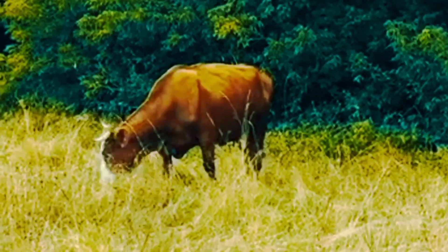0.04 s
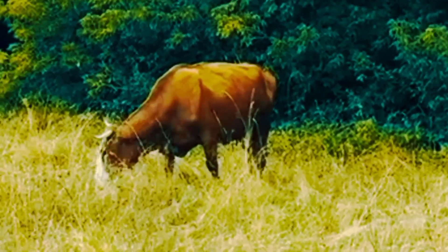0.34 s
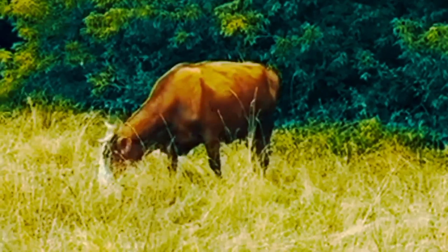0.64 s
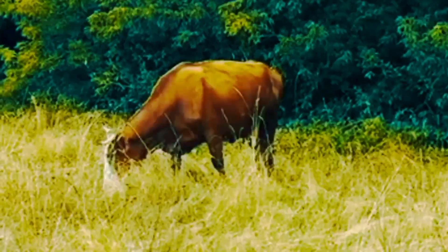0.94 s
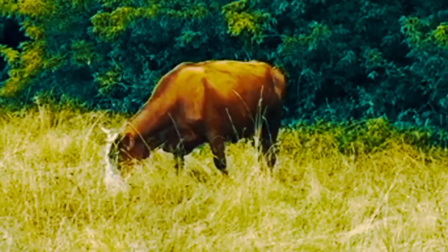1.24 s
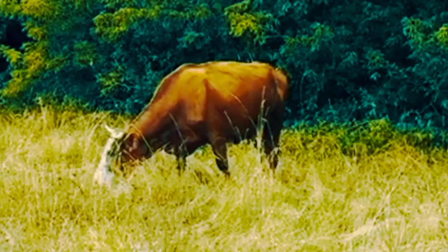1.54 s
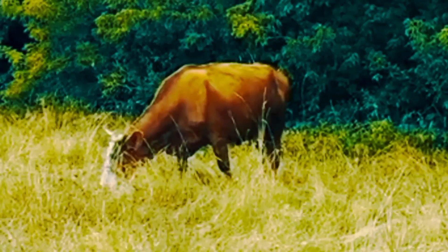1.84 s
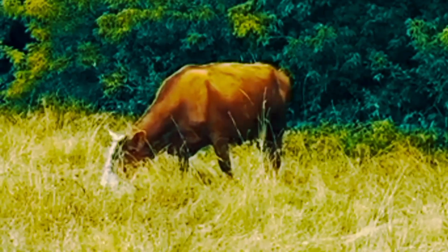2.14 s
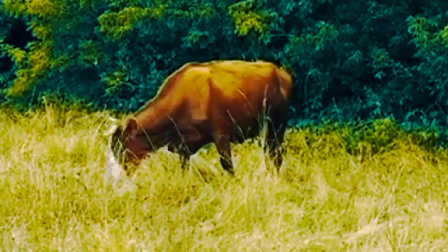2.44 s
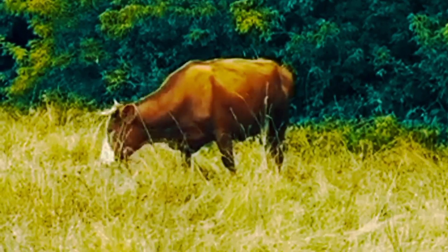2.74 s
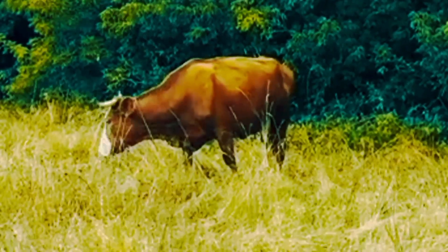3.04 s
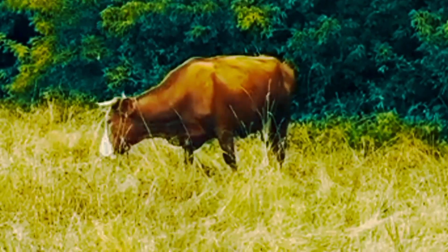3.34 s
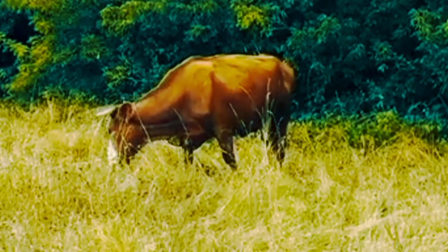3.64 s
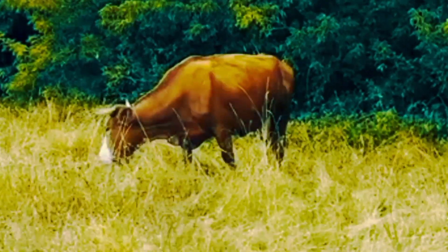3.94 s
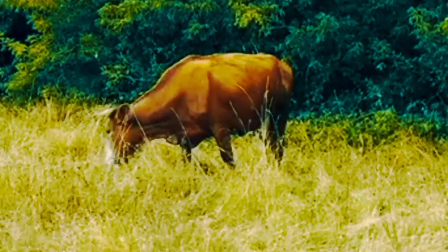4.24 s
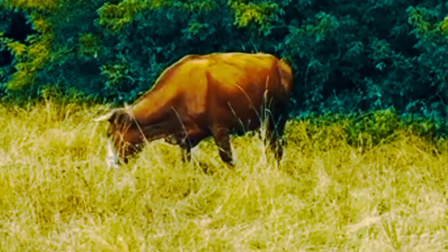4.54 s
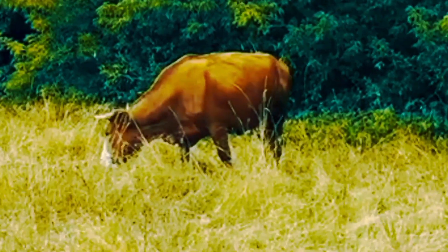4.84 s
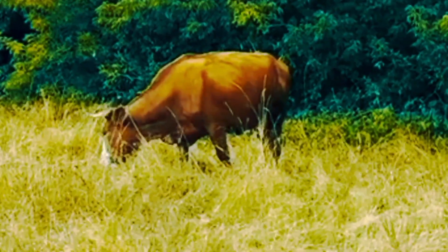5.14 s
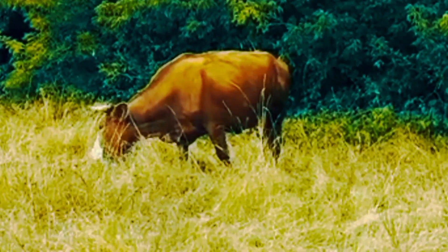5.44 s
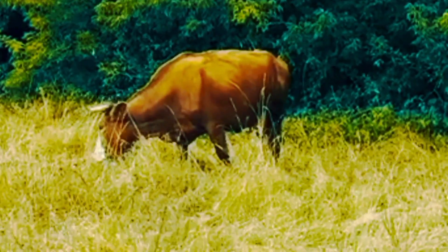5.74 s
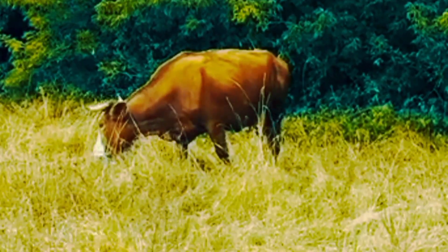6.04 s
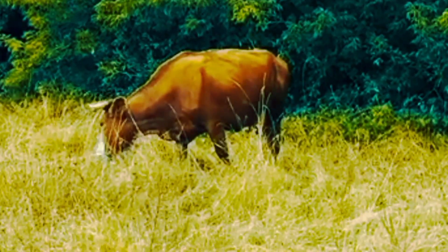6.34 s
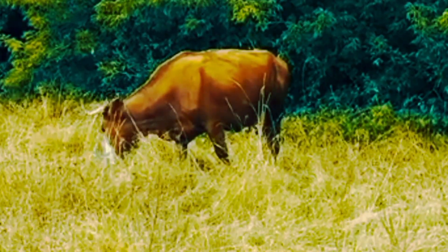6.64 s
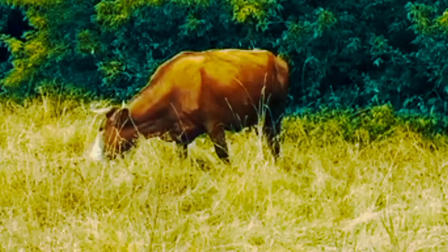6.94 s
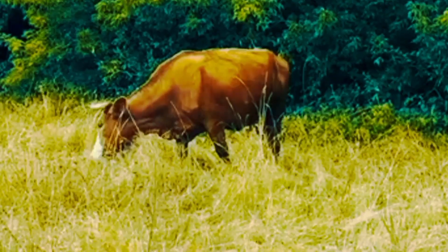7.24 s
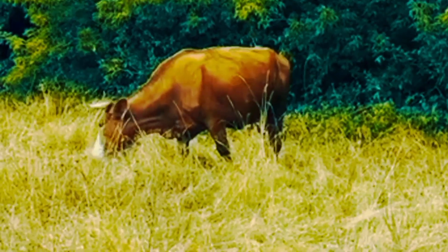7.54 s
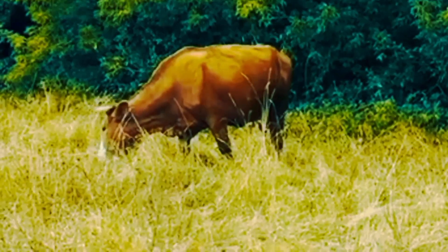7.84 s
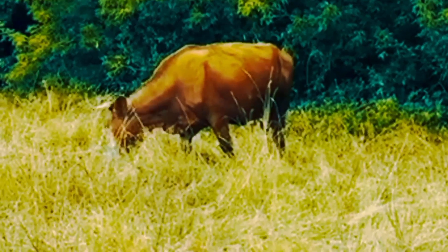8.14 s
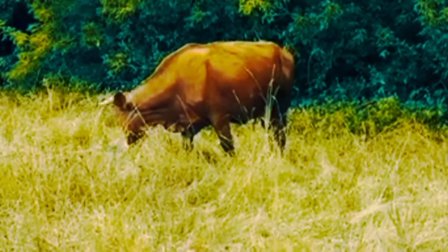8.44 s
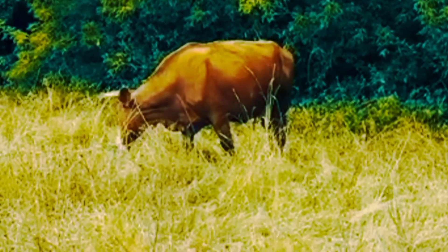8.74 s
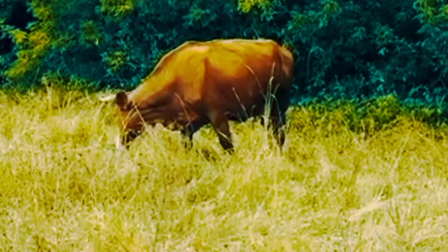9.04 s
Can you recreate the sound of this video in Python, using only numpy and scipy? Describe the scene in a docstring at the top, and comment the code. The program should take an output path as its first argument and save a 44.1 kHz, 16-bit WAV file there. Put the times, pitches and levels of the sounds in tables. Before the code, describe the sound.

Songbirds twitter and whistle over a soft hiss of air, then a cow gives two long moos, one running into the other.

```python
"""Songbirds sing throughout in gliding pure tones, over a distant chorus and a soft hiss of air.
A falling run of slurs opens deep in the trees; evenly repeated twitters and buzzing slides follow,
then, from 4.7 s, a run of thin rising whistles. At 6.7 s a cow moos in a train of vocal-fold pulses;
hard surroundings ring and answer her, and a low rumble comes with her.
At 8.2 s her second call rises out of the end of the first."""
import sys
import numpy as np
from scipy import signal
from scipy.fft import rfft, irfft, next_fast_len
from scipy.io import wavfile
from scipy.ndimage import uniform_filter1d, map_coordinates

SR = 44100
rng = np.random.default_rng(int(sys.argv[2]) if len(sys.argv) > 2 else 0)


def transcribe(signal):
    """Save signal, clipped to [-1, 1], as a 16-bit WAV file at the path in sys.argv[1]."""
    frames = np.atleast_2d(signal).T
    limited = np.clip(frames, -1, 1)
    pcm = np.round(limited * 32767).astype(np.int16)
    wavfile.write(sys.argv[1], SR, pcm)


N = 404838
TIME = np.arange(N) / SR

# tone of the hiss: (frequency [Hz], gain [dB])
AIR_COLOUR = [(20, -1.5), (50, 0), (160, -2.5), (300, -10), (520, -5.5), (800, -9), (1050, -6),
              (1660, -12.5), (4000, -9), (8000, -20.3), (15500, -18.5)]
# its stereo width: (frequency [Hz], side over mid [dB])
AIR_WIDTH = [(30, 4), (120, -6.5), (600, -5.5), (8000, -.5)]
# reverb of the trees and of the hard yard: (frequency [Hz], time to fall 60 dB [s])
TREE_DECAY = [(2000, 0.36), (4500, 0.84), (7000, 0.81)]
YARD_DECAY = [(100, 1), (400, 0.35), (1500, 0.42), (5000, 0.12)]
# fader ride on the far birds: (time [s], relative level [dB])
CHORUS_RIDE = [(0, -37), (.7, -36), (1.63, -32), (2.6, -37.5), (3.3, -31.5), (4.6, -31), (5.5, -36.5),
               (6.6, -39), (7.2, -30), (9.18, -34)]
# their tone: (frequency [Hz], gain [dB])
CHORUS_COLOUR = [(1500, -12), (2100, -8.5), (2700, 2), (3800, 3), (5000, -7), (6500, -19.5), (7600, -49),
                 (8500, -60)]
# course of the falling run: (time [s], start pitch [Hz], level [dB], dry gain [dB])
CASCADE_COURSE = [(.083, 7700, -44, -12), (.86, 7050, -36, -2), (1.16, 5900, -35.5, -1.5),
                  (1.465, 5080, -35.5, -1.5)]
# cues of the rising whistles: (time [s])
WHISTLE_CUES = [4.69, 4.896, 5.119, 5.35, 5.583, 5.818, 6.072, 6.315, 6.576, 6.855, 7.17]
# shapes of a slur, by name: (middle pitch [x start pitch], end pitch [x start pitch])
SLUR_SHAPES = {"fall": (.84, .71), "hook": (.65, .66), "sag": (.94, .93), "scoop": (.94, 1.11),
               "rise": (1.14, 1.17), "climb": (1.4, 1.55), "crest": (1.045, .85)}
# single slurs: (time [s], shape, length [s], start pitch [Hz], level [dB])
SLUR_CUES = [(.34, "sag", .08, 4100, -41), (.424, "crest", .11, 6220, -36), (.49, "sag", .085, 3350, -37),
             (.554, "fall", .1, 5750, -35.5), (.62, "fall", .1, 6900, -36), (.721, "sag", .18, 2680, -37),
             (.745, "scoop", .135, 4030, -29.5), (.965, "scoop", .135, 4000, -31.5),
             (1.0, "sag", .1, 3100, -39), (1.14, "sag", .11, 3680, -37), (1.09, "rise", .06, 2050, -42),
             (1.374, "sag", .11, 3220, -33), (1.585, "fall", .11, 6250, -34.5),
             (1.73, "sag", .09, 3000, -38), (1.777, "fall", .085, 6000, -37),
             (1.93, "climb", .18, 3080, -35.5), (2.426, "hook", .03, 6400, -30),
             (3.08, "hook", .056, 6800, -26.5), (3.18, "fall", .025, 5200, -29),
             (3.729, "sag", .16, 2200, -39), (3.774, "hook", .035, 6700, -28),
             (3.825, "sag", .052, 4450, -26), (4.495, "scoop", .056, 4250, -24),
             (4.503, "sag", .1, 2420, -38), (4.803, "rise", .062, 3090, -30.5),
             (4.954, "sag", .09, 4290, -29.5), (5.068, "sag", .19, 2060, -43),
             (5.201, "sag", .045, 3480, -26.5), (5.279, "sag", .1, 2800, -32),
             (5.338, "fall", .035, 4500, -33), (5.459, "fall", .042, 4100, -35),
             (6.915, "fall", .08, 4700, -38), (8.831, "rise", .072, 3120, -35),
             (8.995, "sag", .12, 4170, -33.5)]
# notes of each syllable, by name: (delay [s], length [s], start pitch [Hz], middle pitch [Hz],
# end pitch [Hz], relative level [dB], buzz swing [Hz])
SYLLABLES = { "long slide": [(0, .07, 6540, 6600, 6240, -6.5, 444), (.065, .08, 6420, 5050, 3920, 0.5, 93),
             (.148, .055, 3750, 3000, 2550, -4, 60)], "short slide": [(0, 0.013, 4680, 5978, 6700, -2.5, 0),
             (.01, 0.077, 6560, 6200, 5350, 0, 453), (.08, .035, 5250, 4425, 3950, 0.5, 94),
             (.112, .03, 4200, 3350, 2950, -1, 92), (.143, 0.0355, 2510, 2833, 2350, -2.5, 101)],
             "twitter": [(0, 0.034, 4680, 5050, 5280, -3.5, 0), (.013, .023, 3940, 4750, 5230, 0.5, 0),
             (.03, .018, 3600, 4200, 4400, 2.5, 0), (.043, .02, 4856, 3642, 3230, 0.5, 302)],
             "swoop": [(0, 0.05, 6850, 5850, 5500, -5, 90), (.036, .03, 5460, 4400, 3850, 5.5, 0),
             (.06, .045, 3950, 3800, 3700, 1.5, 0)], "arch": [(0, 0.05, 2490, 3090, 3780, -2.5, 0),
             (.043, 0.03, 3685, 3804, 3250, 5.5, 0)], "chip": [(0, 0.031, 2668, 3160, 3520, 1, 0),
             (.02, 0.0101, 3560, 3180, 2620, 4.5, 0)], "buzz": [(0, .11, 5250, 5180, 5150, 0, 330)]}
# evenly repeated syllables:
# (syllable, first time [s], last time [s], count, first level [dB], last level [dB])
PHRASES = [("arch", 2.06, 2.592, 5, -33, -37), ("swoop", 2.725, 4.106, 3, -30.5, -29.5),
           ("chip", 2.837, 3.544, 6, -35.5, -30.5), ("twitter", 2.909, 3.48, 5, -27.5, -29.5),
           ("long slide", 3.631, 4.407, 4, -27.5, -23), ("buzz", 4.632, 5.15, 5, -37, -36.5),
           ("twitter", 7.473, 8.002, 5, -27.5, -27), ("short slide", 8.143, 9.063, 5, -26.5, -26.5)]
# sharp downward ticks: (time [s], start pitch [Hz], level [dB])
TICK_CUES = [(5.272, 5400, -31), (5.507, 4200, -32), (5.7, 5400, -35), (5.746, 4700, -28),
             (5.937, 5600, -28), (5.988, 4400, -29.5), (6.233, 4900, -29.5), (6.485, 4400, -34),
             (6.751, 5200, -33), (7.408, 5200, -35)]
# trills: (time [s], length [s], pitch [Hz], swing [Hz], trill rate [Hz], level [dB])
TRILL_CUES = [(2.777, 0.21, 7500, 130, 42, -42.5), (5.316, 0.28, 7480, 120, 42, -46),
              (5.396, 0.47, 4710, 60, 42, -42), (6.1, 0.17, 4700, 60, 35, -44),
              (8.22, 0.32, 7500, 110, 75, -48.5)]
# where the singers sit in the mix: (time [s], wet over dry [dB], left over right [dB])
SONG_PLACEMENT = [(0, -4.5, -2.4), (1.8, -1.5, -4.2), (2.3, -3, -3.2), (4.5, -5, -1.4), (6, -4, -.6),
                  (9.18, -12.5, 0)]
# fader ride on the rumble: (time [s], level [dB])
RUMBLE_RIDE = [(6.55, -70), (6.75, -43), (6.96, -36), (7.0, -32), (7.07, -38.5), (7.8, -39), (8.3, -36.5),
               (9.18, -40)]
# its tone: (frequency [Hz], gain [dB])
RUMBLE_COLOUR = [(20, -20), (50, 0), (80, -3), (160, -9.5), (400, -16), (900, -16.5), (2000, -25),
                 (5000, -60)]
# performance of each moo: (time [s], pitch [Hz], effort as relative overtone level [dB])
FIRST_MOO = [(6.68, 98.3, -55), (6.742, 102.2, -43), (6.832, 104.9, -36), (6.966, 112.7, -33),
             (7.25, 121.8, -26), (7.276, 122.5, -29), (7.534, 127.7, -23), (7.758, 126.9, -24),
             (7.868, 123.5, -29), (8.042, 112.4, -29), (8.156, 99.4, -35), (8.2, 91.4, -41)]
SECOND_MOO = [(8.2, 90.8, -41), (8.308, 93.5, -42), (8.458, 100.1, -42), (8.508, 104.4, -43),
              (8.576, 106.9, -43), (8.728, 116.5, -33), (8.806, 119.0, -26), (8.922, 125.7, -30),
              (8.956, 130.6, -27), (8.986, 132.9, -26), (9.158, 139.8, -28), (9.18, 142.0, -29)]
# body of each moo, before trim: (time [s], fundamental level [dB], octave level [dB])
FIRST_CHEST = [(6.68, -49, -59), (6.764, -36, -45), (6.862, -31, -45), (7.006, -33, -33), (7.03, -36, -46),
               (7.188, -40, -23), (7.754, -35, -26), (7.802, -34, -36), (7.906, -45, -20),
               (8.122, -37, -39), (8.2, -43, -37)]
SECOND_CHEST = [(8.25, -43, -38), (8.558, -42, -37), (8.596, -39, -29), (8.69, -32, -38), (8.796, -49, -25),
                (8.83, -33, -31), (8.93, -43, -19), (8.954, -32, -28), (9.18, -35, -19)]
# resonances of each moo, voice and ringing surroundings together: (frequency [Hz], gain [dB])
FIRST_MOO_COLOUR = [(250, -19), (295, 8.5), (380, 0), (500, -7.5), (635, -2), (760, -14), (890, 4.5),
                    (1020, -0.5), (1140, -12.5), (1270, 0.5), (1520, -10), (1660, 0.5), (1900, -20),
                    (2170, -5), (2400, -5), (2700, -22.5), (3300, -17.5), (4800, -35), (6500, -54)]
SECOND_MOO_COLOUR = [(230, -14), (320, 5), (480, -7.5), (700, -5), (834, -0.5), (940, -6), (1070, 6.5),
                     (1220, -14), (1385, 2.5), (1650, -21), (2230, -2), (3200, -39), (6000, -46)]
# grit in the cow's voice: (time [s], roughness [0-1])
ROUGHNESS = [(6.7, 0.21), (7.0, 0.07), (7.2, 0.02), (7.8, .03), (7.95, .2), (8.1, .45), (8.6, .25),
             (8.75, .48), (8.98, .38), (9.15, .15)]


def amp(db):
    """Decibels to gain."""
    return 10 ** (np.asarray(db) / 20)


def unit(x):
    """Scale to rms 1."""
    return x / np.sqrt(np.mean(x ** 2) + 1e-20)


def along(points, hz):
    """Read (frequency [Hz], value) points on a log axis."""
    f, v = np.transpose(points)
    return np.interp(np.log(hz + 1), np.log(f + 1), v)


def curves(rows):
    """One automation curve for each column after the time."""
    s, *cols = np.transpose(rows)
    return [np.interp(TIME, s, c) for c in cols]


def wobble(rate, size=N):
    """A smooth random curve, rate knots a second."""
    knots = rng.standard_normal(int(size * rate / SR) + 4)
    return map_coordinates(knots, [np.arange(size) * rate / SR])


def filtered(x, response):
    """Zero-phase EQ; response gives the gain at each frequency."""
    m = next_fast_len(N + SR // 8, real=True)
    return irfft(rfft(x, m) * response(np.fft.rfftfreq(m, 1 / SR)), m)[..., :N]


def resonate(x, spectrum, size=4096):
    """Minimum-phase EQ: every pulse rings after it arrives."""
    cepstrum = irfft(np.log(amp(along(spectrum, np.fft.rfftfreq(size, 1 / SR)))))
    cepstrum[1:size // 2] *= 2
    cepstrum[size // 2 + 1:] = 0
    return signal.oaconvolve(x, irfft(np.exp(rfft(cepstrum))))[:N]


def noise(spectrum, width):
    """Coloured stereo noise of rms 1."""
    white = rng.standard_normal((2, N))
    mid, side = filtered(white, lambda hz: amp([along(spectrum, hz),
                                                along(spectrum, hz) + along(width, hz)]))
    return unit(np.array([mid + side, mid - side]))


def reverb(x, decay):
    """A diffuse stereo tail; each frequency dies at its own speed."""
    hz, t, bands = signal.stft(rng.standard_normal((2, SR)), SR, nperseg=256)
    tail = signal.istft(bands * amp(-60 * t / along(decay, hz)[:, None]), SR, nperseg=256)[1]
    tail = np.pad(tail / np.linalg.norm(tail[0]), ((0, 0), (SR // 100, 0)))  # 10 ms pre-delay
    return signal.oaconvolve(x[None], tail, axes=1)[:, :N]


def add(track, s, sound):
    """Mix a sound in at time s."""
    part = track[max(round(s * SR), 0):][:len(sound)]
    part += sound[:len(part)]


def band_level(x, lo_hz, hi_hz):
    """Running rms of one band."""
    band = signal.sosfilt(signal.butter(8, [lo_hz, hi_hz], "bandpass", fs=SR, output="sos"), x)
    return np.sqrt(np.abs(uniform_filter1d(band ** 2, SR // 12)) + 1e-12)


def air():
    """The bed: a soft, steady hiss of still air."""
    return amp(-42) * noise(AIR_COLOUR, AIR_WIDTH)


def note(length, start_hz, middle_hz, end_hz, swing_hz=0, trill_hz=150,
         waver=.0062, flutter_db=2, overtone_db=-42):
    """One bird note: a near-pure tone gliding through three pitches, swung to and fro when it buzzes."""
    t = np.arange(max(int(length * SR), 64)) / SR
    progress = t / t[-1]
    contour = np.polyfit([0, .5, 1], np.log([start_hz, middle_hz, end_hz]), 2)
    glide = np.exp(np.polyval(contour, progress))
    swing = swing_hz * np.sin(2 * np.pi * trill_hz * t + .5 * wobble(40, len(t)))
    phase = 2 * np.pi * np.cumsum(glide * (1 + waver * wobble(250, len(t))) + swing) / SR
    swell = np.abs(np.sin(np.pi * progress)) ** .43
    # a buzz is loudest at the bottom of each swing
    flutter = amp(flutter_db * wobble(120, len(t)) - 4.5 * swing / 500)
    return unit(swell * flutter * (np.sin(phase) + amp(overtone_db) * np.sin(2 * phase)))


def chorus(count=560):
    """Many far birds: short random slurs, blurred by the trees, over a wash of noise in their range."""
    song = np.zeros(N)
    for when, span, height, slope, bend, size in rng.random((count, 6)):
        hz = 2000 * 3 ** height
        fall = 1 + .35 * (slope - .4)
        slur = note(.015 + .045 * span, hz * fall, hz * (.92 + .16 * bend), hz / fall, waver=.014)
        add(song, when * N / SR, amp(8.9 * size) * slur)
    song = filtered(song, lambda hz: amp(along(CHORUS_COLOUR, hz)))
    far = unit(song * amp([[-1], [1]]) + reverb(song, TREE_DECAY))
    wash = noise(CHORUS_COLOUR, width=[(3000, -15.5)])
    return amp(curves(CHORUS_RIDE)[0]) * (amp(-4.2) * far + amp(-7.5) * wash)


def cascade(count=19):
    """A bird deep in the trees sings a falling run, growing louder and drier; reverb trails each slur."""
    song = np.zeros(N)
    times, pitch_hz, level_db, _ = np.transpose(CASCADE_COURSE)
    for s in np.linspace(times[0], times[-1], count):
        hz = np.interp(s, times, pitch_hz)
        slur = note(.038, hz, hz * .9, hz * .79, waver=.013)
        add(song, s, amp(np.interp(s, times, level_db)) * slur)
    direct = amp(curves(CASCADE_COURSE)[2]) * song
    return (direct + amp(.5) * reverb(song, TREE_DECAY)) * amp([[-1.6], [1.6]])


def whistler():
    """One bird draws out its rising whistles ever longer, lower and louder; each swells, then fades."""
    song = np.zeros(N)
    for s, progress in zip(WHISTLE_CUES, np.linspace(0, 1, len(WHISTLE_CUES))):
        length = np.interp(progress ** 3, [0, 1], [.14, .23])
        hz = np.interp(progress ** 1.6, [0, 1], [6290, 5840])
        db = np.interp(progress ** 3.2, [0, 1], [-39.8, -30.8])
        tone = note(length, hz, hz * 1.071, hz * 1.328, waver=.0025, flutter_db=2.5, overtone_db=-33)
        swell = amp(np.interp(np.linspace(0, 1, len(tone)), [0, .4, 1], [-8, 0, -11]))
        add(song, s, amp(db) * unit(tone * swell))
    return song + amp(-9.5) * reverb(song, TREE_DECAY)


def songbirds(tick_s=.0095, tick_fall=.86):
    """The featured singers: slurs, repeated phrases, ticks and trills, answered by the trees."""
    song = np.zeros(N)
    for s, shape, length, hz, db in SLUR_CUES:
        middle, end = SLUR_SHAPES[shape]
        add(song, s, amp(db) * note(length, hz, hz * middle, hz * end))
    for name, first_s, last_s, count, first_db, last_db in PHRASES:
        for s, db in np.linspace((first_s, first_db), (last_s, last_db), count):
            for delay, length, *pitches, note_db, swing_hz in SYLLABLES[name]:
                tone = note(length, *pitches, swing_hz, waver=.015, overtone_db=-34)
                add(song, s + delay, amp(db + note_db) * tone)
    for s, hz, db in TICK_CUES:
        add(song, s, amp(db) * note(tick_s, hz, hz * tick_fall, hz * tick_fall ** 2))
    for s, length, hz, swing_hz, trill_hz, db in TRILL_CUES:
        trill = note(length, hz, hz, hz, swing_hz, trill_hz, waver=.0113, flutter_db=2.5)
        add(song, s, amp(db) * trill)
    wet_db, pan_db = curves(SONG_PLACEMENT)
    wet = amp(wet_db)
    blend = (song + wet * reverb(song, TREE_DECAY)) / np.hypot(1, wet)
    return blend * amp([pan_db / 2, -pan_db / 2])


def rumble():
    """Low noise that swells in with the cow and stays under both calls."""
    return amp(curves(RUMBLE_RIDE)[0]) * noise(RUMBLE_COLOUR, width=[(30, 2), (80, -22.5), (800, -1.5)])


def vocal_folds(pitch_hz, jitter, rasp, split):
    """Phase and pulse train of the folds; roughness makes the pulses uneven and breathy."""
    rough = curves(ROUGHNESS)[0]
    phase = 2 * np.pi * np.cumsum(pitch_hz * (1 + jitter * rough * wobble(70))) / SR
    shimmer = amp(5 * rough * wobble(110))
    alternation = 1 + split * rough * np.cos(phase / 2)  # strong and weak pulses take turns
    pulses = unit(np.diff(np.floor(phase / (2 * np.pi)), prepend=0)) * shimmer * alternation
    turbulence = unit(rng.standard_normal(N) * (1 + np.cos(phase)) ** 2)  # air escapes once a cycle
    return phase, pulses + rasp * rough * turbulence


def mouth(voice, effort_db, bright_db, open_db=-31, muffle_hz=760):
    """Effort opens the mouth; below open_db it closes, muffling the vowel and dulling the top end."""
    vowel = filtered(voice, lambda hz: 1 / (1 + (hz / 1480) ** 12))
    top = voice - vowel
    shut_db = np.minimum(effort_db - open_db, 0)
    muffled = filtered(vowel, lambda hz: 1 / (1 + (hz / muffle_hz) ** 10))
    vowel = muffled + amp(.75 * shut_db) * (vowel - muffled)
    brightness = amp(bright_db + 1.7 * shut_db)
    # both bands are levelled, so effort rides the loudness
    levelled = vowel / band_level(vowel, 320, 1450) + brightness * top / band_level(top, 1500, 2600)
    return amp(effort_db) * levelled


def moo(performance, chest_levels, colour, jitter, rasp, split, mouth_db, bright_db):
    """One call as two stems: two strong chest partials; overtones coloured by voice and surroundings."""
    pitch_hz, effort_db = curves(performance)
    phase, pulses = vocal_folds(pitch_hz, jitter, rasp, split)
    overtones = amp(mouth_db) * mouth(resonate(pulses, colour), effort_db, bright_db)
    fundamental_db, octave_db = curves(chest_levels)
    fundamental = amp(fundamental_db + .3) * np.sin(phase)
    octave = amp(octave_db + 1.3) * np.sin(2 * phase)
    chest = np.sqrt(2) * (fundamental + octave)
    fade_in = np.clip((TIME - performance[0][0]) / .057 + .5, 0, 1)
    fade_out = np.clip((performance[-1][0] - TIME) / .035 + 1, 0, 1)
    return np.array([chest, overtones]) * fade_in * fade_out


def cow():
    """Two moos, the second rougher and darker; the yard returns more overtones than chest tone."""
    first = moo(FIRST_MOO, FIRST_CHEST, FIRST_MOO_COLOUR,
                jitter=.022, rasp=.9, split=.1, mouth_db=-2, bright_db=.3)
    second = moo(SECOND_MOO, SECOND_CHEST, SECOND_MOO_COLOUR,
                 jitter=.035, rasp=1, split=.45, mouth_db=-1.7, bright_db=-14)
    chest, overtones = first + second
    direct = (chest + overtones) * amp([[-.7], [.7]])  # just right of centre
    return direct + reverb(amp(-17) * chest + amp(-6) * overtones, YARD_DECAY)


def scene():
    """The mix, from the air bed up to the cow."""
    return air() + chorus() + cascade() + whistler() + songbirds() + rumble() + cow()


def record(dry, top_hz=15830):
    """A brick-wall low-pass on the master."""
    return filtered(dry, lambda hz: hz < top_hz)


dry = scene()
out = record(dry)
transcribe(out)
```